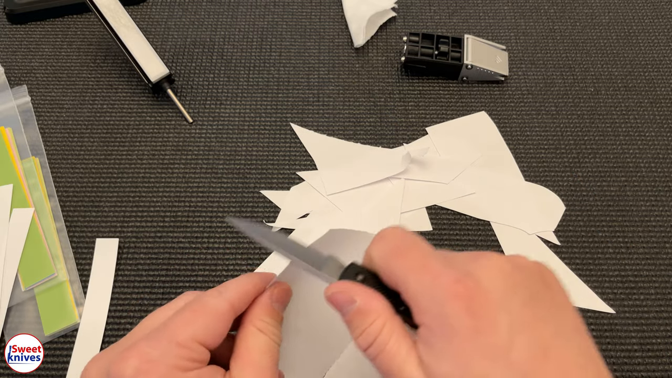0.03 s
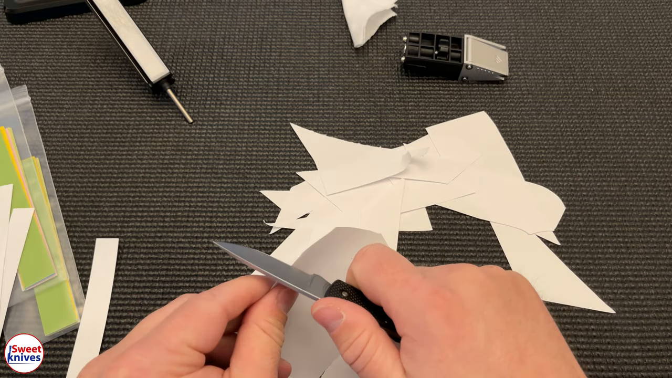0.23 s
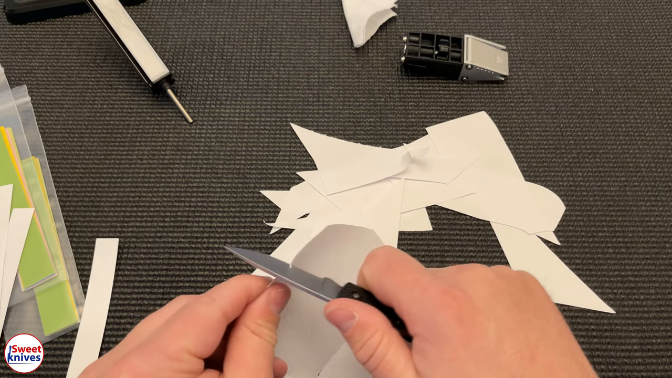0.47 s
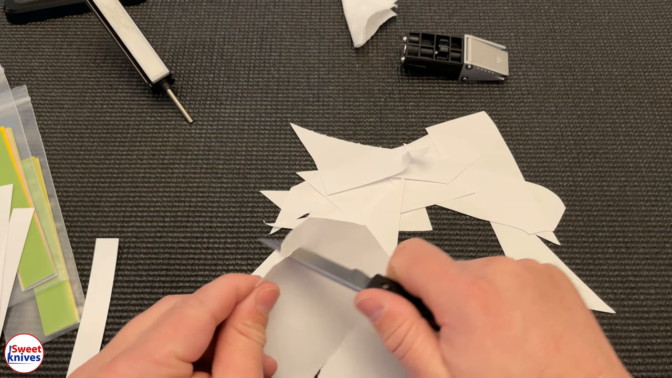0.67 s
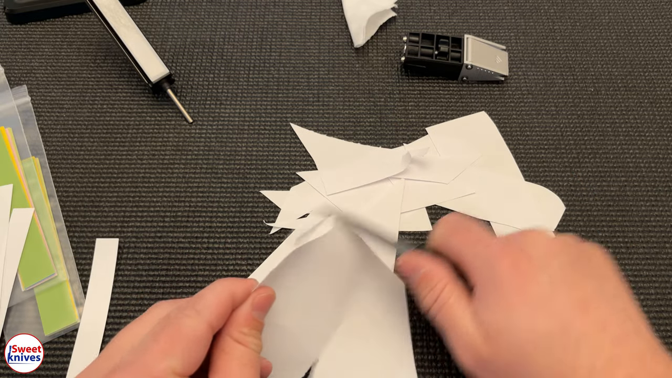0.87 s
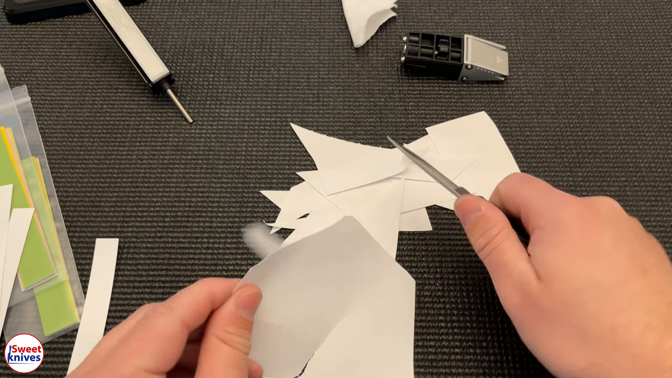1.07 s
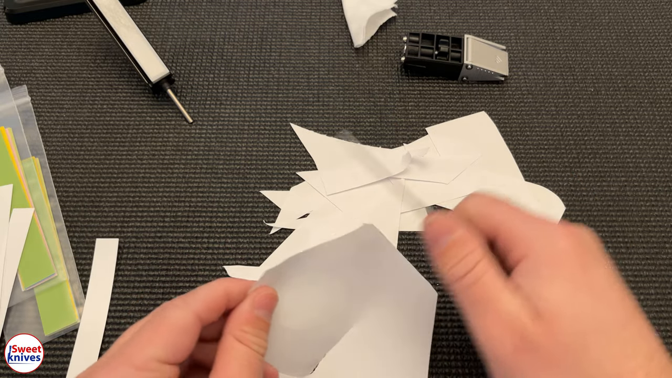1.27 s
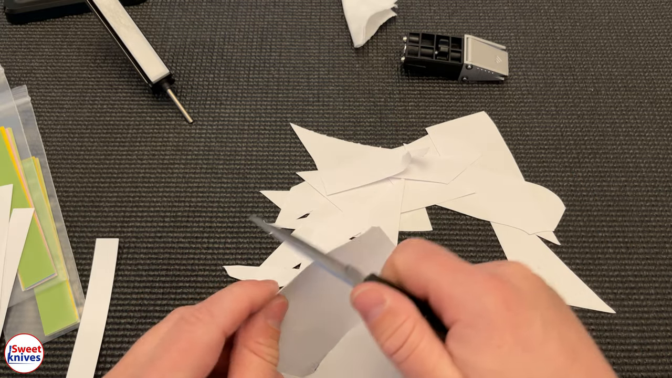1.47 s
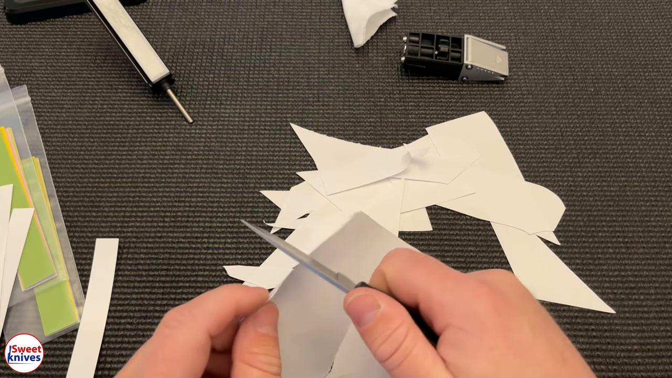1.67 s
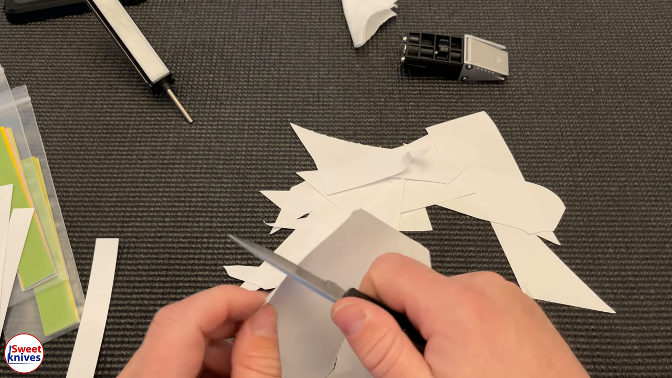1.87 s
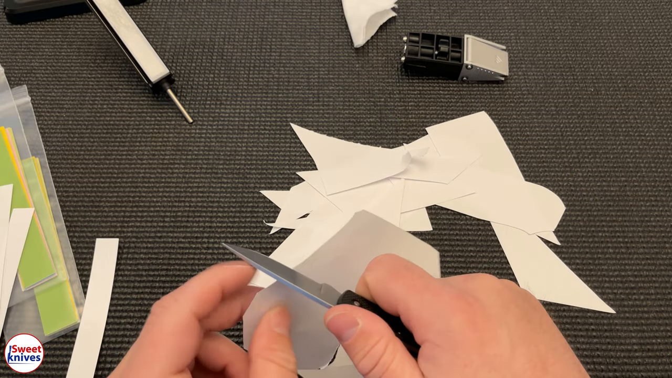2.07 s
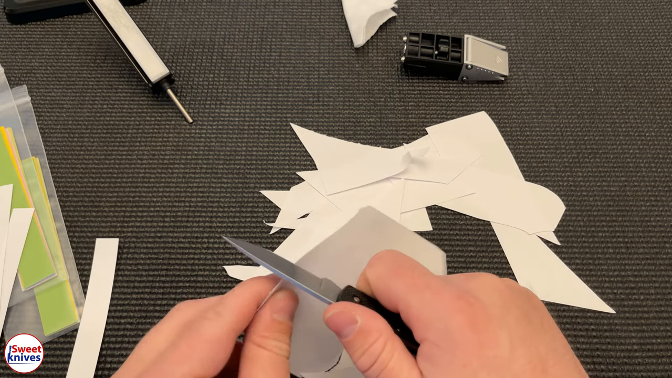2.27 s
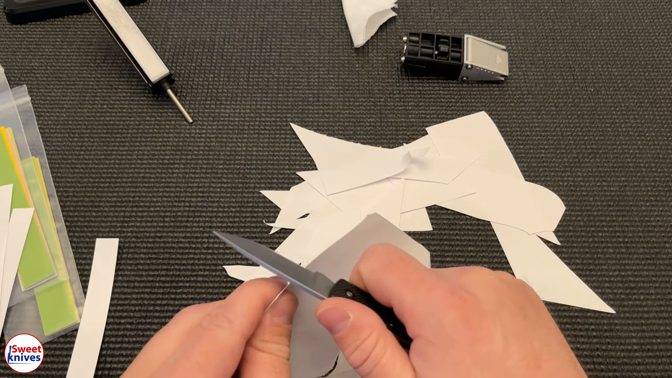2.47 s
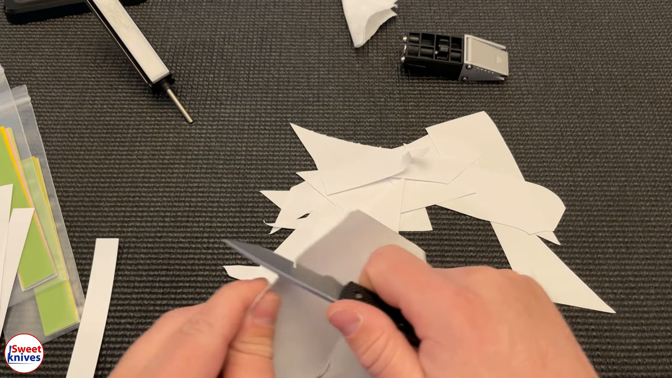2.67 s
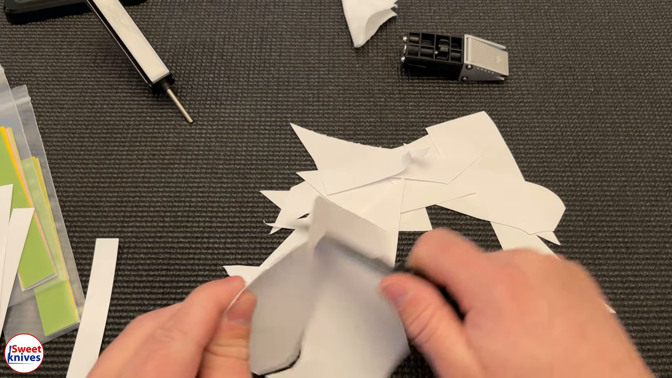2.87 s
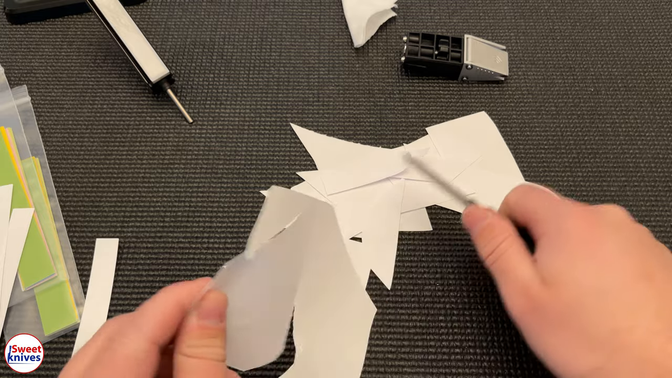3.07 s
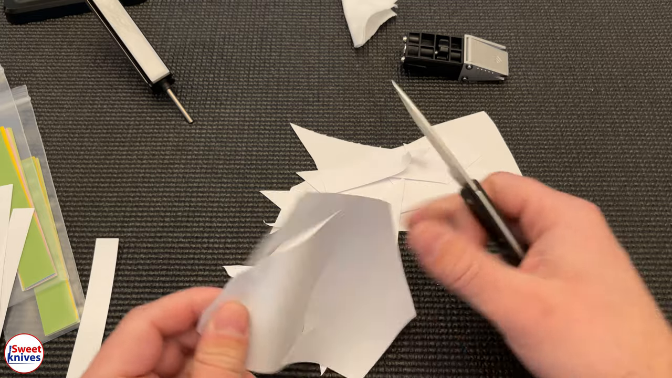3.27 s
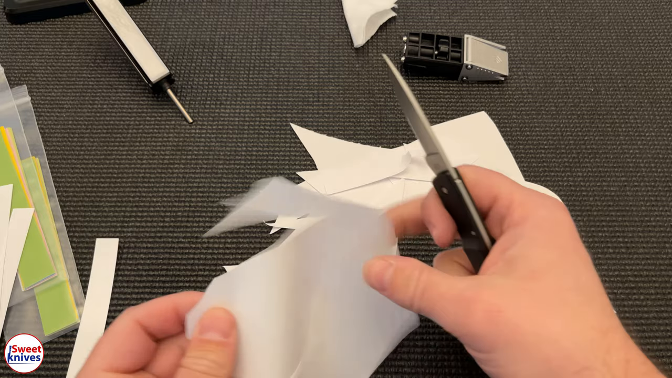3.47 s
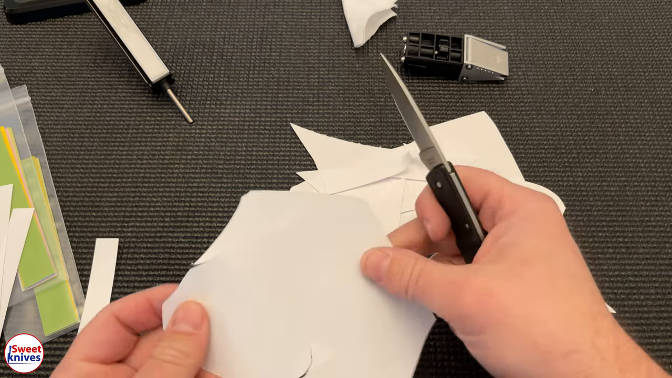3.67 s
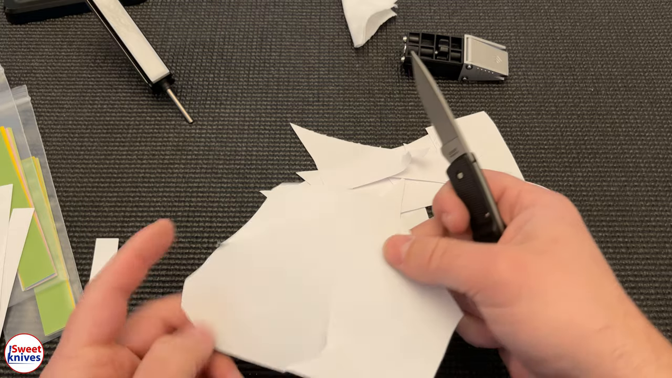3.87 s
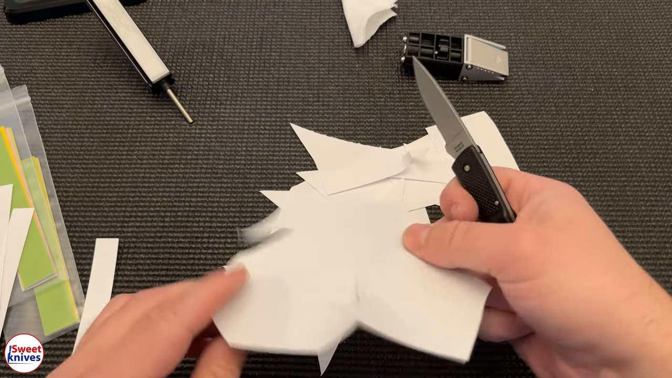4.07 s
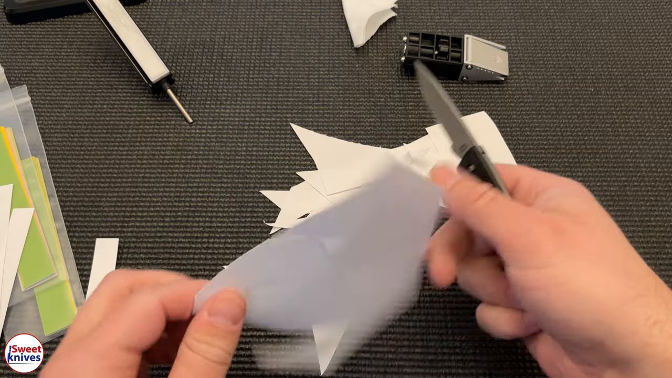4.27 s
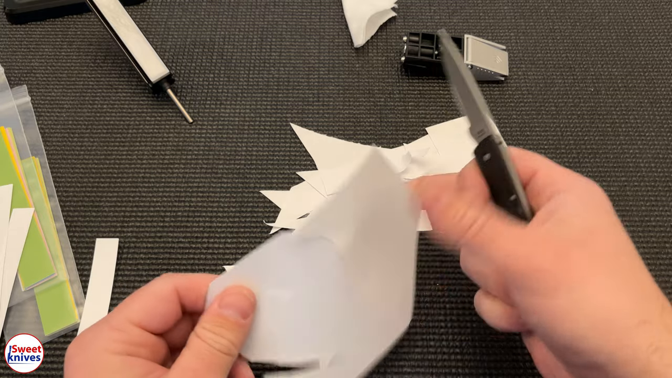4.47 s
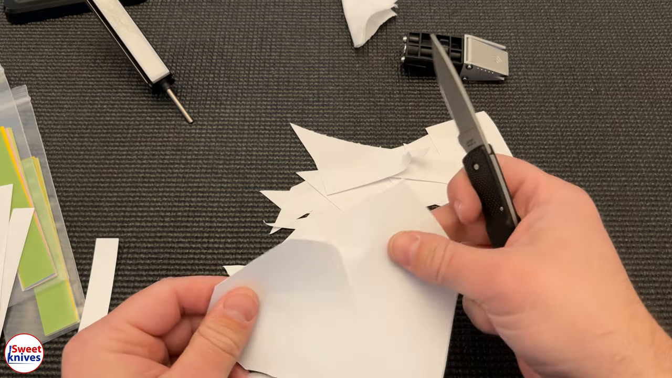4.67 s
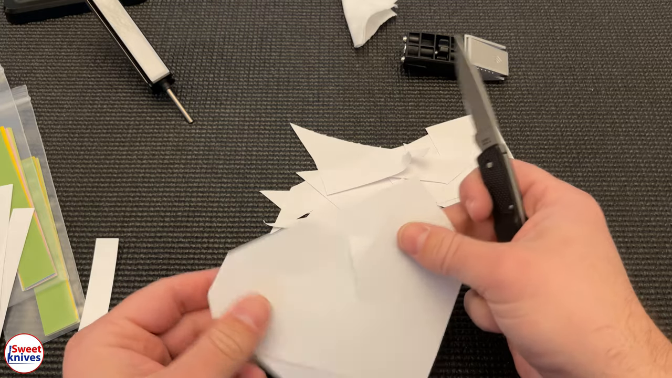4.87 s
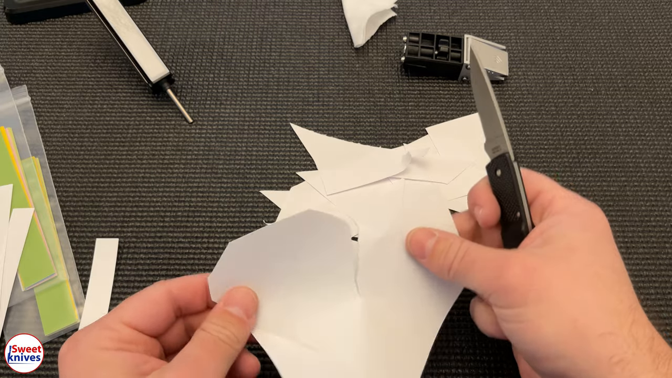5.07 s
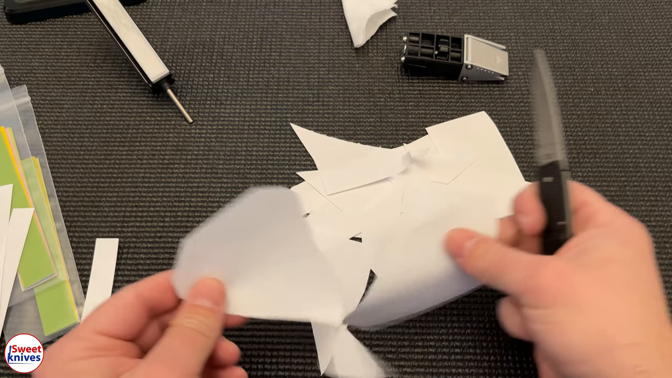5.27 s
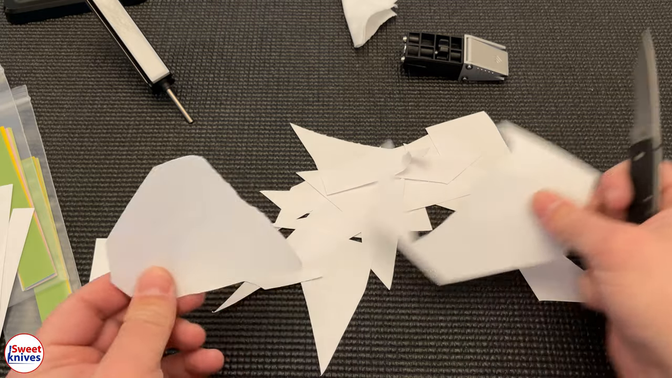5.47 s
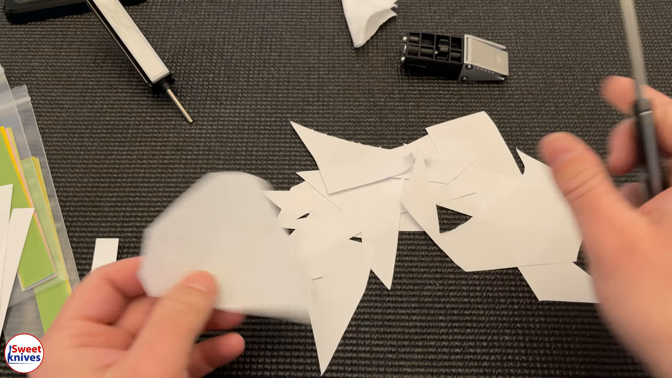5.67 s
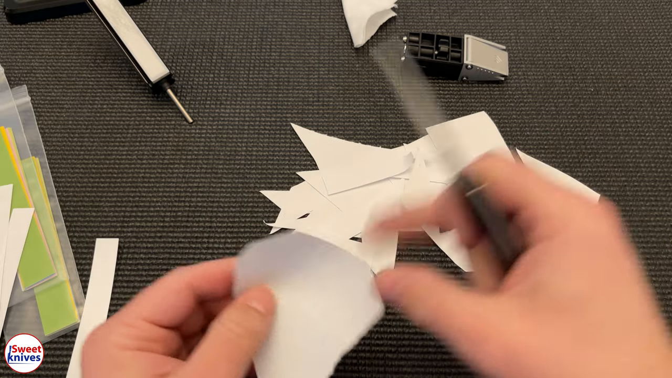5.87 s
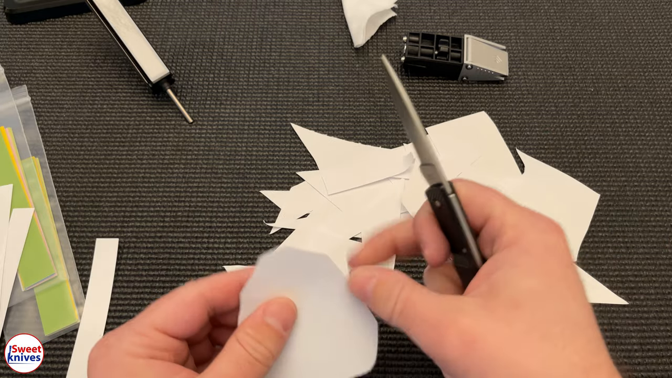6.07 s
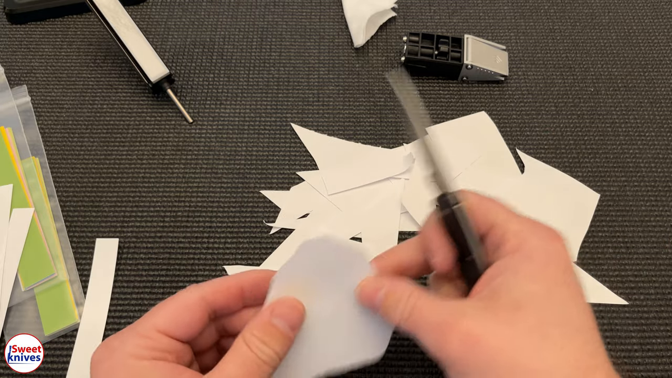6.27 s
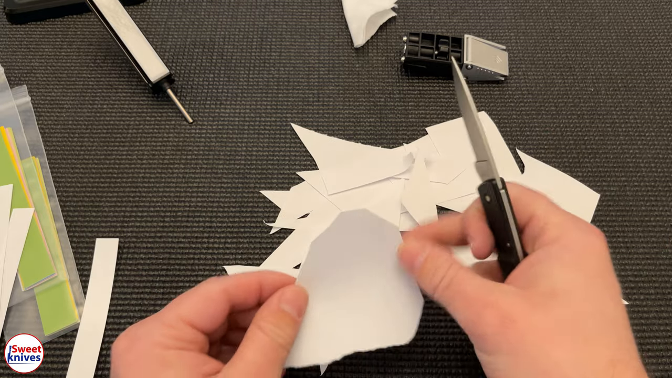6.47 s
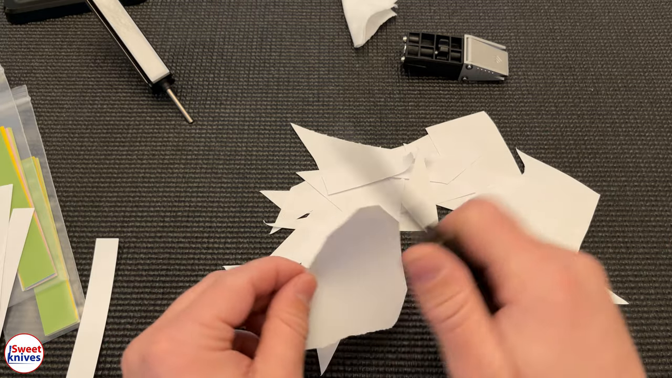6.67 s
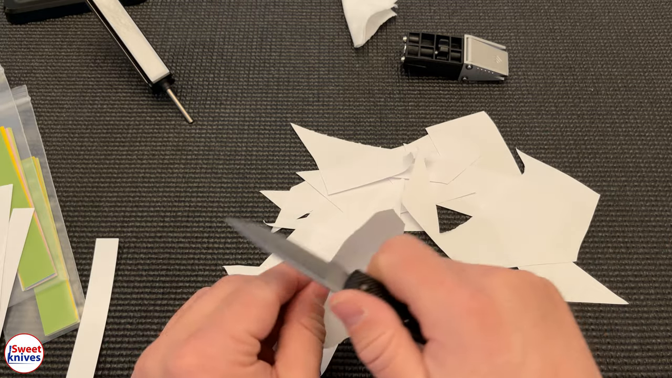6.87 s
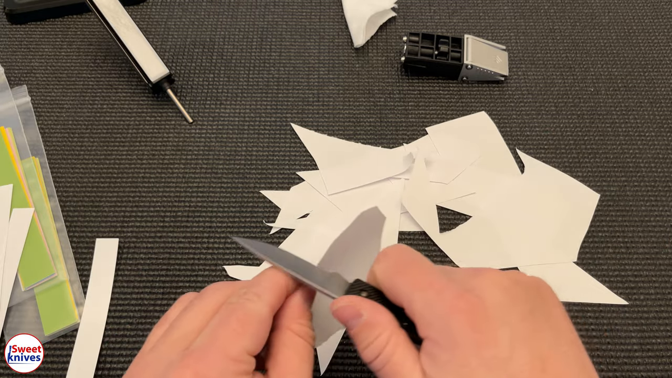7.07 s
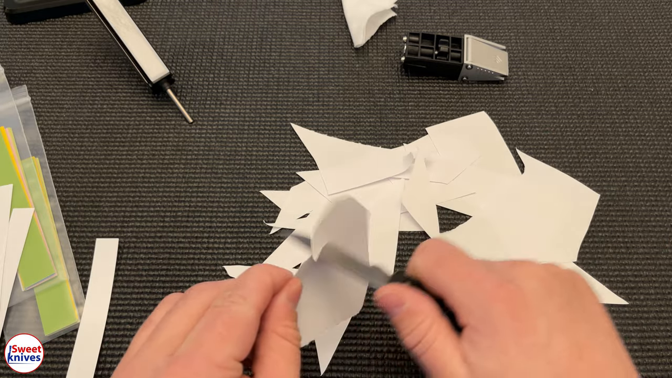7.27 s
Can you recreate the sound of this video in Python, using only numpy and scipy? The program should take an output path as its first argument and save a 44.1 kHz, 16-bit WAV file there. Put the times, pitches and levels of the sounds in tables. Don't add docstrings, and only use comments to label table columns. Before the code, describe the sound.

Close to the microphone in a small quiet room, a keen blade slices paper in a fine, zipping hiss that swells to a sharp parting snap. Fingers rustle the sheet, a second slice ends in a hard crackle, creases pop and the sheet flaps. A short coarse rip follows, handling fades, and a third slice begins.

```python
import sys
import numpy as np
from scipy import signal
from scipy.fft import rfft, irfft
from scipy.io import wavfile
from scipy.ndimage import uniform_filter1d, map_coordinates

SR = 44100
rng = np.random.default_rng(int(sys.argv[2]) if len(sys.argv) > 2 else 0)


def undo_db(level):
    steps = np.asarray(level, float) / 20
    return 10 ** steps


def pcm_store(signal):
    levels = np.round(np.clip(np.atleast_2d(signal), -1, 1) * 32767)
    wavfile.write(sys.argv[1], SR, levels.astype(np.int16).T)


N = 322371


def rms_one(x):
    return x / np.sqrt(np.mean(x ** 2) + 1e-20)


def at_hz(points, hz):
    table_hz, table_db = np.transpose(points)
    return np.interp(np.log(hz), np.log(table_hz), table_db)


def drift(rate_hz):
    r = np.exp(-80 * np.pi * rate_hz / SR)
    noise = rng.standard_normal(N // 40 + 2002)
    slow = signal.lfilter([1], [1, -2 * r, r * r], noise)[2000:]
    return np.interp(np.arange(N) / 40, np.arange(len(slow)), rms_one(slow))


def crackle(count, per_s, spread_db):
    sizes = undo_db(spread_db * np.minimum(rng.exponential(1, count), 5))
    sizes = sizes * rng.choice([-1, 1], count)
    return rms_one(sizes * (rng.random(count) < per_s / SR) + 1e-9)


def resonance(x, hz, width_hz):
    r = np.exp(-np.pi * width_hz / SR)
    poles = [1, -2 * r * np.cos(2 * np.pi * hz / SR), r * r]
    return signal.lfilter([(1 - r * r) / 2, 0, (r * r - 1) / 2], poles, x)


def band(x, low_hz, high_hz, order=2):
    return signal.sosfilt(signal.butter(order, [low_hz, high_hz], "band", fs=SR, output="sos"), x)


def strokes(tables):
    t = np.arange(N) / SR
    level_db, bright_db = np.full(N, -150.0), np.zeros(N)
    for rows in tables:
        s, row_db, row_bright_db = np.transpose(rows)
        on = (t >= s[0]) & (t <= s[-1])
        level_db[on] = np.interp(t[on], s, row_db)
        bright_db[on] = np.interp(t[on], s, row_bright_db)
    return uniform_filter1d(undo_db(level_db), size=120), bright_db - np.median(np.vstack(tables)[:, 2])


BAND_EDGES_HZ = 220 * 2 ** np.arange(0, 6.3, 1 / 5)
CONTROL_HZ = np.array([700, 2500, 5500, 11000])


def sheet_colour(x, stroke, lean, colour, patchy_db, patch_hz):
    level, bright_db = stroke
    live = level > 1e-7
    out, steady, heard = 0, 0, np.zeros(N)
    for k, (low, high) in enumerate(zip(BAND_EDGES_HZ, BAND_EDGES_HZ[1:])):
        hz = np.sqrt(low * high)
        colour_db = at_hz(colour, min(hz, 15000))
        part = band(x[live], low, high) * undo_db(colour_db) * (-1) ** k
        share = np.interp(np.log(hz), np.log(CONTROL_HZ), lean)
        out = out + part * undo_db(share * bright_db[live] + patchy_db * drift(patch_hz)[live])
        steady = steady + part
    heard[live] = out / np.std(band(steady, 1500, 12000))
    return level * heard


# f/Hz, level/dB per Hz
HUM_COLOUR = [(15, -53), (25, -24.5), (104, -4), (144, -6), (216, -8), (248, -8.5), (316, -13.5),
              (352, -11.5), (437, -15.5), (791, -19), (955, -22.5), (1430, -24), (15800, -35)]


def hum():
    f = np.fft.rfftfreq(N, 1 / SR)
    noise = irfft(rfft(rng.standard_normal(N)) * undo_db(at_hz(HUM_COLOUR, np.maximum(f, 1))), N)
    return undo_db(-69.5 + 0.21 * drift(0.22)) * rms_one(noise)


# t/s, level/dB, brightness/dB
HANDS = [(0, -66, 2), (.2, -68, -9), (.32, -75, -12), (1.1, -80, 1), (1.45, -70.5, 1), (1.67, -69, -4),
         (1.95, -65.5, 0), (2.24, -73, 9), (2.5, -77, -28), (3.1, -66, -3), (3.85, -67.5, -1.5),
         (3.999, -72.5, 0), (4.42, -67, -1), (5.09, -69.5, -3), (5.55, -72.5, 2), (6.42, -77, -9),
         (6.55, -89, -15), (7.31, -101, 2)]
# peak t/s, peak level/dB, rise/s, fall/s, brightness/dB
SLIPS = [(1.185, -58.5, 0.076, 0.059, -13), (1.284, -59.5, 0.015, 0.029, -1), (1.338, -63, 0.015, 0.032, 0),
         (1.48, -78, 0.014, 0.64, 0), (2.138, -55.5, 0.088, 0.085, 0), (2.257, -45, 0.0078, 0.014, -46.5),
         (2.29, -61, .03, 0.12, -11), (3.156, -43.5, 0.0025, 0.045, -9), (3.343, -53.5, 0.046, 0.081, 1.5),
         (3.498, -53, 0.085, 0.026, -1), (3.529, -39, 0.012, 0.0047, -4), (3.55, -56, 0.0092, 0.14, -6),
         (3.722, -78, .04, 0.07, 6), (4.009, -62, 0.0027, 0.51, -6), (4.215, -56, 0.12, 0.1, 7),
         (4.283, -48, 0.024, 0.015, 12), (4.285, -46, 0.0022, 0.027, -9), (4.552, -56.5, 0.041, 0.056, -9),
         (4.64, -63, 0.048, 0.034, 6), (4.938, -59.5, 0.14, 0.018, -15), (5.634, -58.5, 0.033, 0.037, -18),
         (5.69, -61.5, 0.066, 0.14, -2.5), (5.935, -59.5, 0.078, 0.06, 7),
         (6.178, -58.5, 0.018, 0.0086, -23), (6.318, -65.5, 0.038, 0.029, 12),
         (1.86, -67, 0.03, 0.045, 4), (3.33, -57, .004, .07, 4), (1.585, -60.5, 0.075, 0.047, -3.5),
           (2.0, -59.5, 0.22, 0.034, -1.5), (2.205, -64, 0.054, 0.032, 14), (5.118, -63, 0.044, 0.028, 5),
           (5.605, -68.5, 0.029, 0.054, 21), (5.874, -59, 0.004, 0.076, 11.5),
           (3.835, -70, 0.018, 0.02, 20), (5.09, -68.5, .02, .04, 15), (6.225, -65.5, .03, 0.033, 3),
           (6.42, -71, 0.076, 0.031, 15)]
SLIP_SWING_DB = 15


def fingers():
    t = np.arange(N) / SR
    s, db, bright_db = np.transpose(HANDS)
    power = undo_db(2 * np.interp(t, s, db))
    leaning = power * np.interp(t, s, bright_db)
    for s, db, rise_s, fall_s, bright_db in SLIPS:
        away = np.maximum((s - t) / max(rise_s, .002), (t - s) / max(fall_s, .002))
        slip = undo_db(2 * (db - SLIP_SWING_DB * away))
        power, leaning = power + slip, leaning + bright_db * slip
    return np.sqrt(power), leaning / power


# f/Hz, level/dB per Hz
RUB_COLOUR = [(260, -6.5), (450, -6.5), (595, -7), (765, -1.5), (1150, -7.5), (2240, -3.5), (3490, -1.5),
              (8810, -5), (15200, -16.5)]


def rubs():
    grains = crackle(count=N, per_s=5000, spread_db=2.0) * undo_db(1.37 * drift(70))
    hollow = undo_db(-13) * resonance(grains, hz=4860, width_hz=400)
    return undo_db(-4.0) * sheet_colour(grains + hollow, fingers(), lean=[-0.28, -0.17, 0.17, 0.9],
                                    colour=RUB_COLOUR, patchy_db=1.5, patch_hz=36.0)


# t/s, peak level/dB, low edge f/Hz, high edge f/Hz
TICKS = [(0.3294, -55, 6500, 14000), (0.168, -62, 3500, 7000), (1.1905, -48, 4200, 13000),
         (2.1234, -49, 3200, 12000), (3.4472, -39, 3500, 8000), (3.5182, -28.5, 3000, 14500),
         (4.008, -50, 3000, 8000), (4.017, -54, 3000, 6500), (4.070, -48, 1500, 9000),
         (4.078, -47, 900, 3000), (4.2815, -35, 1000, 9000), (4.5385, -46, 900, 14000),
         (4.8923, -51, 3220, 12000), (6.169, -48, 3200, 12000), (2.8935, -30, 1500, 9000),
         (2.8965, -24, 1000, 7000), (2.904, -29, 1200, 5000), (2.867, -30, 1000, 6000),
         (3.305, -53, 3800, 9000), (3.4995, -43, 3500, 11000), (3.507, -45, 3500, 7500),
         (3.5278, -38, 3770, 14000), (3.5685, -51, 5000, 15000), (4.634, -49, 3500, 10000),
         (4.627, -52, 3500, 8000), (4.640, -51, 3500, 12000), (4.714, -54, 3500, 12000),
         (4.853, -57, 3500, 12000), (4.566, -52, 3500, 9000), (5.134, -40, 3500, 15500),
         (0.359, -54, 800, 6000), (2.539, -46, 1500, 9000), (2.2528, -41, 600, 5500),
         (2.2595, -42, 800, 4500), (5.628, -47, 500, 2500), (5.636, -46, 600, 3800),
         (4.288, -36, 700, 4500), (3.156, -38, 1500, 9000), (5.946, -56, 3500, 9000),
         (5.956, -57, 3500, 7000), (5.872, -54, 3500, 13000), (5.982, -58, 6000, 9500),
         (1.833, -54, 700, 5000), (4.9265, -42, 700, 6000), (4.9385, -46, 900, 6500),
         (3.577, -50, 4000, 15000), (1.198, -50, 4500, 12500), (1.216, -56, 5000, 12500)]
TICK_DECAY_S = 0.0012


def ticks():
    out, t = np.zeros(N + 400), np.arange(400) / SR
    for s, peak_db, low_hz, high_hz in TICKS:
        click = rng.standard_normal(len(t)) * np.exp(-t / TICK_DECAY_S) + 5.1 * (t == 0)
        tick = band(click, low_hz, min(high_hz, 17000), order=3)
        out[round(s * SR):][:len(t)] += undo_db(peak_db + 2.0) * tick / np.abs(tick).max()
    return out[:N]


# t/s, peak level/dB, body re peak/dB, ring f/Hz, burst/s
CRISP = [(0.186, -57, -3, 4200, 0.011), (1.129, -55.5, -23, 5200, 0.027), (1.195, -43.5, -24, 5900, 0.0062),
         (1.275, -52.5, -26, 3940, 0.015), (1.329, -48, -26, 4540, 0.023), (1.478, -50, -23, 4400, 0.022),
         (1.968, -51, -44, 3390, 0.016), (2.194, -55, -27, 2700, 0.033), (2.304, -51.5, -4, 2920, 0.018),
         (3.451, -42.5, -9, 5000, 0.0081), (3.483, -41.5, 1, 4970, 0.0032), (3.57, -50, 9.5, 2340, 0.017),
         (3.708, -48, -2, 5240, 0.024), (4.068, -50.5, 0, 5940, 0.058), (4.769, -51.5, -26, 5170, 0.026),
         (4.892, -50.5, 4, 5100, 0.021), (5.3, -39, 1, 4500, 0.017), (5.868, -54, -2.5, 7540, 0.027),
         (6.165, -56.5, 7, 3400, 0.02), (6.305, -60.5, 13.5, 2470, 0.022), (6.412, -67.5, 6.5, 5230, 0.042)]
# t/s, peak level/dB, body re peak/dB, ring f/Hz, burst/s
DULL = [(0.803, -31.5, -27, 4400, 0.027), (1.8317, -53, 5, 3030, 0.01), (2.121, -44, -14, 3800, 0.017),
        (2.2546, -37, -7, 2860, 0.016), (2.857, -31, -7, 2390, 0.028), (2.896, -23.5, -4.5, 3050, 0.0084),
        (4.282, -35, -2.5, 2500, 0.026), (3.156, -34.5, -32, 2520, 0.0089),
        (3.3042, -45.5, -28, 4730, 0.011), (3.331, -48.5, -8.5, 4910, 0.043),
        (3.4986, -35, -7, 5000, 0.0032), (3.5243, -32.5, -15, 2760, 0.0089),
        (4.342, -43.5, -5, 2010, 0.021), (4.518, -64, 12, 2660, 0.012), (4.544, -52.5, 12, 2900, 0.013),
        (4.6318, -45, 1.5, 4800, 0.015), (4.9277, -40, 0, 3460, 0.003), (4.933, -38, 0, 1920, 0.0078),
        (4.95, -53, 0, 1900, 0.0071), (3.507, -41.5, 2, 2400, 0.0093), (5.626, -49, 12, 2350, 0.014)]
CRISP_EDGE_DB, DULL_EDGE_DB = 0.5, -25
FACET_MODES, FACET_WIDTH, FACET_DB = 9, .05, 9


def snaps():
    out, t = np.zeros(N + 6000), np.arange(6000) / SR
    crisp = [row + (CRISP_EDGE_DB,) for row in CRISP]
    dull = [row + (DULL_EDGE_DB,) for row in DULL]
    for s, peak_db, body_db, hz, length_s, edge_db in sorted(crisp + dull):
        clicks = crackle(count=len(t), per_s=7600, spread_db=5.5)
        clicks = clicks + undo_db(1.5) * resonance(clicks, hz, 0.2 * hz)
        pitches = np.geomspace(500, 13000, FACET_MODES) * rng.uniform(.85, 1.15, FACET_MODES)
        clicks = clicks + undo_db(FACET_DB) * sum(resonance(clicks, p, FACET_WIDTH * p) for p in pitches)
        length_s = max(length_s, .003)
        rise_s = np.interp(peak_db, [-52, -40], [.005, .0008])
        body = (396, 1690, body_db, 0.013)
        ring = (1430, max(1.37 * hz, 3300), 0.01, 0.0072)
        edge = (5560, 13700, edge_db, 0.004)
        snap = 0
        for low, high, db, dying_s in [body, ring, edge]:
            run = np.minimum(t / rise_s, 1) * undo_db(-4.0 * t / length_s)
            run = run * np.exp(-np.maximum(t - length_s, 0) / dying_s)
            burst = run * band(clicks, low, high)
            burst = burst * np.linalg.norm(run) / np.linalg.norm(burst)
            snap = snap + undo_db(db) * band(burst, low, high)
        out[round((s - .0015) * SR):][:len(t)] += undo_db(peak_db - 12.5) * snap
    return out[:N]


# t/s, peak level/dB, f/Hz
FLAPS = [(0.836, -54.5, 178), (0.873, -53.5, 221), (2.857, -43.5, 307), (2.899, -47, 128),
         (3.292, -58.5, 98), (3.57, -52.5, 106), (4.275, -49.5, 129), (4.548, -58, 100),
         (4.636, -52.5, 228), (4.931, -59.5, 94), (5.148, -56, 184), (5.306, -49.5, 80), (0.192, -61, 316),
         (3.326, -57, 111), (5.232, -53, 69.6), (5.625, -61.5, 565), (3.611, -70, 165), (2.127, -61, 256)]


def flaps():
    out, t = np.zeros(N + 6000), np.arange(6000) / SR
    swell = (t / 0.007) * np.exp(1 - t / 0.012)
    for s, peak_db, hz in FLAPS:
        rumble = rms_one(band(rng.standard_normal(len(t)), 53, 427))
        push = (0.6 * np.sin(2 * np.pi * hz * t) + 0.79 * rumble) * swell
        out[round(s * SR):][:len(t)] += undo_db(peak_db - 7.5) * push
    return out[:N]


# f/Hz, width/Hz, level/dB
BLADE = [(1615, 45, -1), (1914, 53, 2.5), (2278, 39, 2), (2570, 45, 3.5), (2735, 27, 1), (3030, 68, 1),
         (3396, 53, -5), (3840, 35, -3), (4240, 30, 4), (4420, 28, -14), (4890, 29, -1), (5200, 13, -7),
         (5890, 33, -0.5), (6460, 31, 0)]
BLADE_WAVER_DB = 1.8


def blade(fibres):
    wavering = drift(14.0)
    out = 0
    for k, (hz, width_hz, db) in enumerate(BLADE):
        swell = undo_db(db + BLADE_WAVER_DB * np.roll(wavering, k * 21000))
        out = out + swell * resonance(fibres, hz, width_hz)
    return out


# t/s, level/dB, brightness/dB
CUTS = [
    [(.331, -69, 11), (.364, -54.5, -20), (.42, -46.5, -6), (.55, -43, -4.5), (.74, -44.5, -4),
     (.815, -33.5, 1), (.836, -33, -2.5), (.85, -51.5, -33), (.905, -51.5, -23)],
    [(2.527, -57, -2), (2.543, -51.5, 0.5), (2.642, -45.5, 0.5), (2.765, -43.5, -2), (2.835, -38, -3.5),
     (2.862, -32.5, -9), (2.885, -40, -11), (2.908, -40, -5), (2.925, -62, -22)],
    [(7.067, -53, -9), (7.08, -50.5, -6), (7.13, -45, -2), (7.19, -44.5, -1.5), (7.244, -40, -3.5),
     (7.31, -40.5, 0)],
]
# f/Hz, level/dB per Hz
CUT_COLOUR = [(180, -47), (300, -14.5), (467, -15), (516, -15), (730, -9), (831, -5), (1400, -8),
              (1950, -3.5), (3950, -2), (4810, 0.5), (10400, -6), (15200, -12)]
# f/Hz, width/Hz, level/dB
SHEET = [
    [[(850, 28, -22), (5200, 46, -9), (3740, 38, -9), (4060, 30, -18), (4910, 33, -13), (5890, 30, -12),
     (6900, 36, -17), (7360, 79, 4), (9550, 250, -3), (10200, 40, -21), (10900, 45, -6)],
     [(2060, 240, -1.5), (3300, 16, -13), (6200, 89, 0), (6500, 42, -17), (6760, 86, -10), (7800, 88, -3),
     (8440, 27, 2), (9000, 40, 1.5), (10200, 47, -8), (11200, 39, -3), (12400, 180, -7)]],
    [[(3400, 66, 1), (1970, 120, -7), (4890, 39, 4), (5900, 50, -7), (7460, 67, -15), (8700, 160, -6),
     (10000, 87, -24), (11000, 45, -14), (11700, 36, -12), (12600, 32, -25), (12800, 30, -20)],
     [(830, 62, -2.5), (3400, 66, -12), (4900, 57, 16), (6130, 34, 11.5), (7950, 36, -2), (7900, 26, -3),
     (8350, 28, -17), (8600, 130, -5), (9500, 34, -4), (10400, 28, -12), (12700, 66, -14)]],
    [[(850, 15, -12), (3020, 380, 9), (3080, 16, -7), (3560, 37, 1), (4400, 40, -16), (4910, 95, -24),
     (6050, 69, -1), (7100, 36, -18), (7640, 35, -33), (8260, 66, -6), (10300, 45, -6)], [(840, 69, -3),
     (3050, 57, -4), (3390, 65, 2), (3810, 26, 3), (4800, 92, 5), (5600, 60, 10), (5900, 34, -14),
     (8370, 37, -1), (8300, 32, -4), (9100, 45, -2), (11750, 53, 2)]],
]
# t/s, spread/s
SHEET_TURNS = [
    (.59, 0.059),
    (2.7, 0.024),
    (7.2, 0.028),
]
# f/Hz, width/Hz, level/dB
LOW_MODES = [(840, 7.3, 0), (1030, 50, -2)]
BITE_DB, BITE_S, BITE_BELOW_HZ = 16.5, .09, 1100
RING_DB, RING_WAVER_DB = 1.5, 2.5
PARTING_S = 0.1


def cuts():
    fibres = crackle(count=N, per_s=6000, spread_db=2.8) * undo_db(1.2 * drift(150))
    rings, shaken = np.zeros(N), blade(fibres)
    for rows, (early, late), (turn_s, spread_s) in zip(CUTS, SHEET, SHEET_TURNS):
        start_s, end_s = rows[0][0], rows[-1][0]
        span = slice(round(start_s * SR) - 400, round(end_s * SR) + 400)
        t = np.arange(N)[span] / SR
        bite_db = BITE_DB * np.exp(-(t - t[0]) / BITE_S)
        turned = (1 + np.tanh((t - turn_s) / spread_s)) / 2
        shares = [1] * len(LOW_MODES) + [1 - turned] * len(early) + [turned] * len(late)
        held = np.clip((end_s - PARTING_S - t) / .04, 0, 1)
        if t[-1] > 7:
            held = np.ones(len(t))
        rings[span] += shaken[span] * held
        wavering = drift(15.0)
        for k, (hz, width_hz, db) in enumerate(LOW_MODES + early + late):
            stands_db = np.clip(db - at_hz(CUT_COLOUR, hz), -10, 0) + bite_db * (hz < BITE_BELOW_HZ)
            swell = undo_db(RING_DB + stands_db + RING_WAVER_DB * wavering[k * 8000:][:len(t)])
            damped_hz = width_hz + .016 * max(hz - BITE_BELOW_HZ, 0)
            rings[span] += resonance(fibres[span], hz, damped_hz) * swell * held * shares[k]
    return undo_db(-2.0) * sheet_colour(fibres + rings, strokes(CUTS), lean=[-0.77, -0.19, 0.059, 0.64],
                                    colour=CUT_COLOUR, patchy_db=1.8, patch_hz=40.0)


# t/s, level/dB, brightness/dB
TEAR = [
    [(5.126, -72, 1), (5.132, -53, 6), (5.142, -41.5, 5.5), (5.175, -35, 5.5), (5.212, -33, 1),
     (5.278, -42.5, 0.5), (5.302, -34.5, 1.5), (5.316, -46.5, -9), (5.34, -59.5, -21)],
]
# f/Hz, level/dB per Hz
TEAR_COLOUR = [(180, -46), (300, -21), (371, -8), (475, -11.5), (817, -5), (1250, -5.5), (4090, -2),
               (15200, -11.5)]
# t/s, level re tear/dB
JERKS = [(5.134, 12), (5.149, 6), (5.168, 4), (5.1757, 5), (5.185, 4), (5.197, -8), (5.203, -11),
         (5.210, 0), (5.227, 2), (5.246, 8), (5.262, 11), (5.286, 12)]
JERK_S = 0.00047


def tear():
    t = np.arange(N) / SR
    jerk_db = sum(db * np.exp(-np.abs(t - s) / JERK_S) for s, db in JERKS)
    fibres = crackle(count=N, per_s=8300, spread_db=2.5) * undo_db(jerk_db + 1.54 * drift(75))
    return undo_db(-3.0) * sheet_colour(fibres, strokes(TEAR), lean=[-0.61, -0.84, -0.1, 1],
                                    colour=TEAR_COLOUR, patchy_db=2.0, patch_hz=35.0)


# f/Hz, width/Hz, level/dB
LOOSE_SHEET = [(1007, 98, -2), (1710, 660, -15), (2400, 100, -14)]


def loose_sheet(x):
    return x + sum(undo_db(db) * resonance(x, hz, width_hz) for hz, width_hz, db in LOOSE_SHEET)


TABLE_LAG_S, TABLE_SWAY_S, TABLE_DB = .00021, .000012, -18.5


def table_echo(x):
    late = np.arange(N) - SR * (TABLE_LAG_S + TABLE_SWAY_S * drift(1.35))
    echo = map_coordinates(x, [late], order=3)
    return (x + undo_db(TABLE_DB) * echo) / np.sqrt(1 + undo_db(2 * TABLE_DB))


# f/Hz, t60/s
ROOM = [(200, 0.52), (1400, 0.46), (4000, 0.39), (9000, 0.29), (15000, 0.19)]
ROOM_DB = -7


def room(x):
    t, tail = np.arange(SR // 2) / SR, 0
    white = rng.standard_normal((2, len(t)))
    for k, low in enumerate(BAND_EDGES_HZ[:-1]):
        decay = undo_db(-60 * t / at_hz(ROOM, low))
        tail = tail + band(white[k % 2], low, low * 2 ** (1 / 5)) * decay
    tail = tail * np.clip((t - .004) / 0.0013, 0, 1)
    return undo_db(ROOM_DB) * signal.fftconvolve(x, tail / np.sqrt(np.sum(tail ** 2)))[:N]


def scene():
    sliced = cuts()
    handled = loose_sheet(rubs() + snaps())
    handled = table_echo(handled + ticks() + tear())
    reverb = room(sliced + undo_db(-2) * handled)
    return (sliced + handled + reverb + flaps() + hum())[None]


def band_limit(x):
    return signal.sosfilt(signal.butter(12, 16740, fs=SR, output="sos"), x)


def record(dry):
    low_pass = signal.ellip(9, .2, 50, 15800, fs=SR, output="sos")
    return band_limit(signal.sosfilt(low_pass, dry))


dry = scene()
out = record(dry)
pcm_store(out)
```